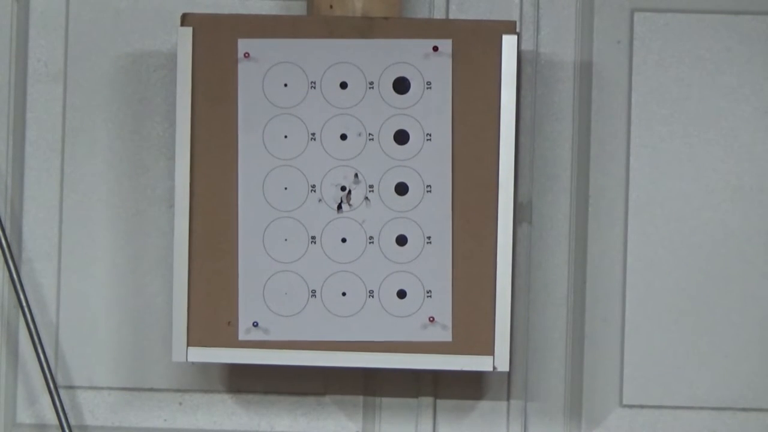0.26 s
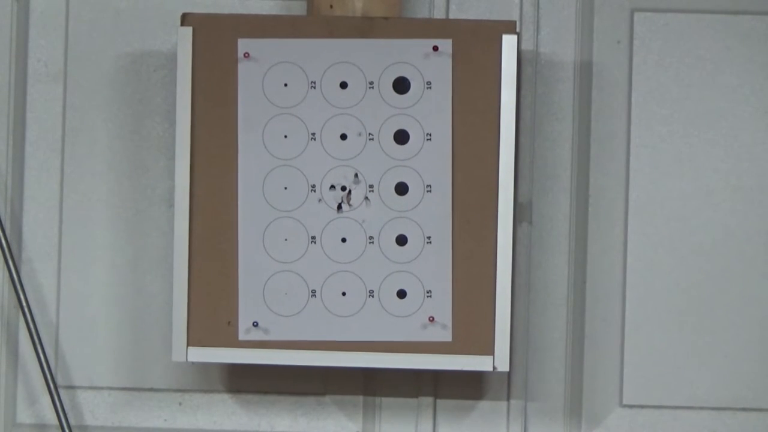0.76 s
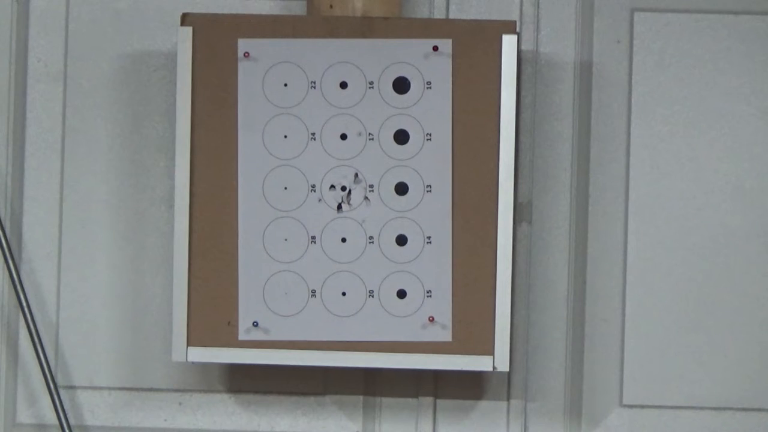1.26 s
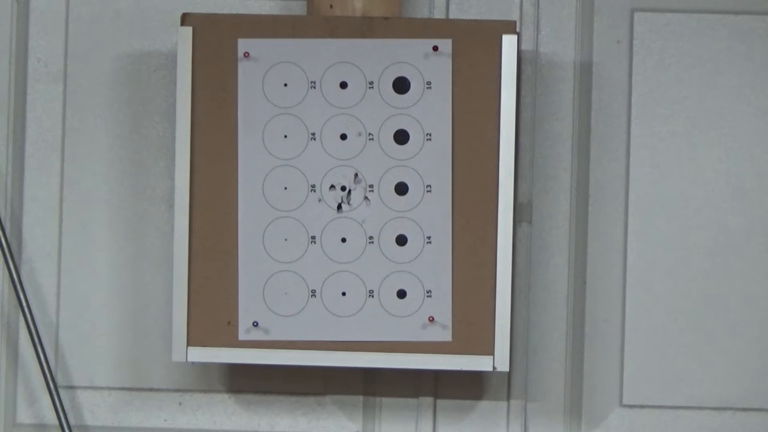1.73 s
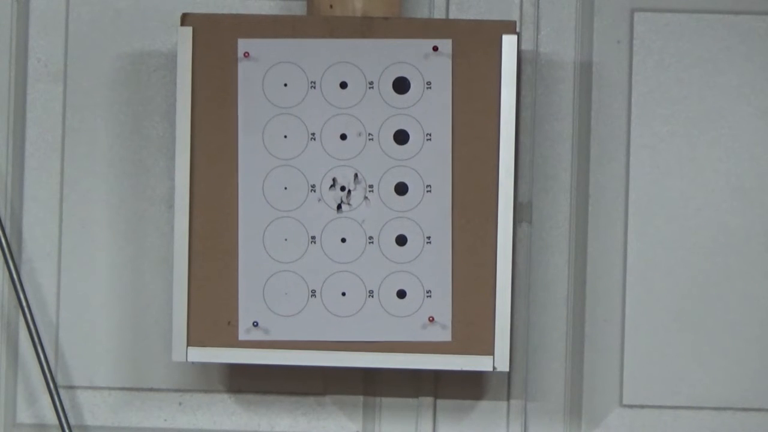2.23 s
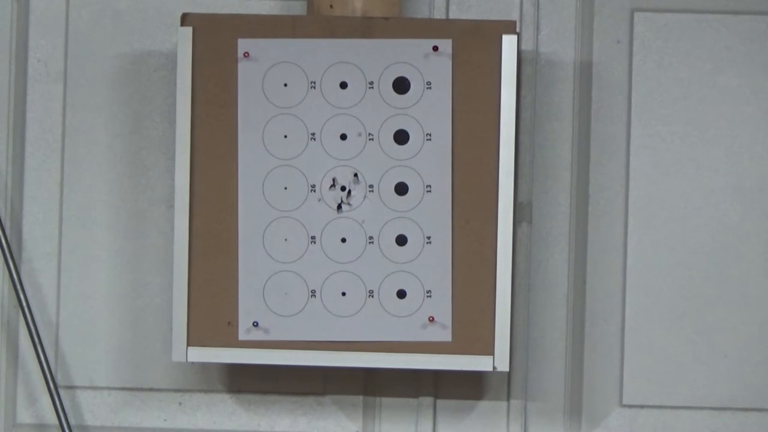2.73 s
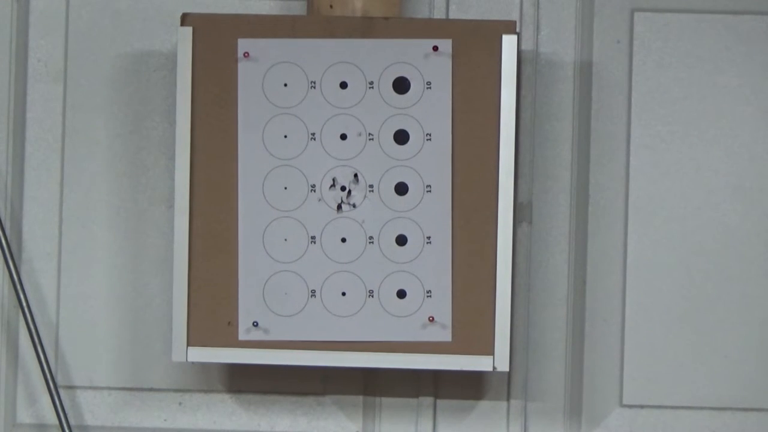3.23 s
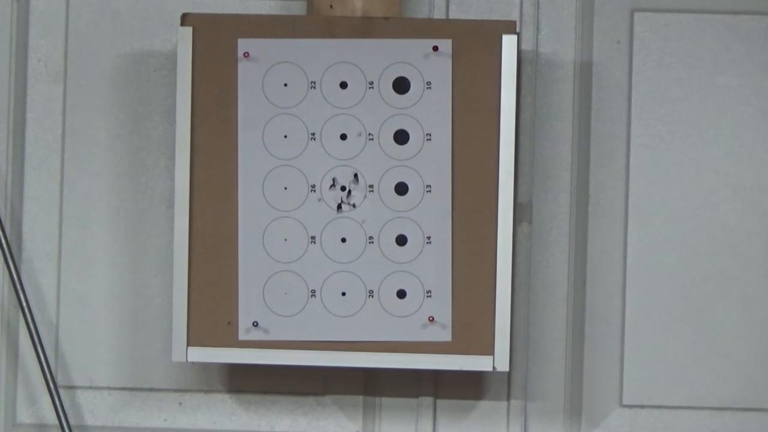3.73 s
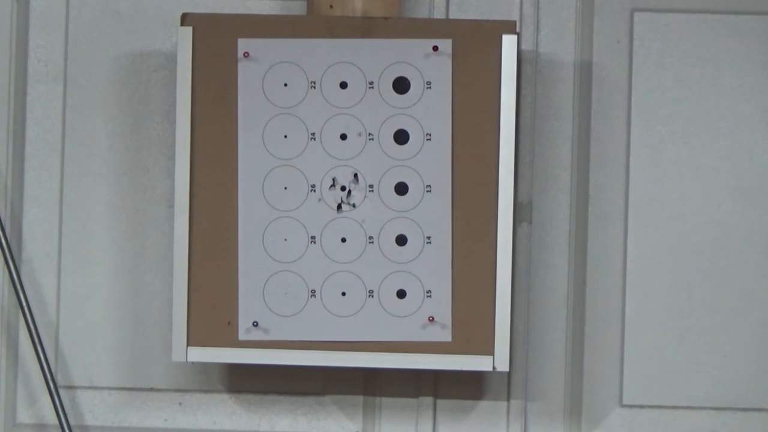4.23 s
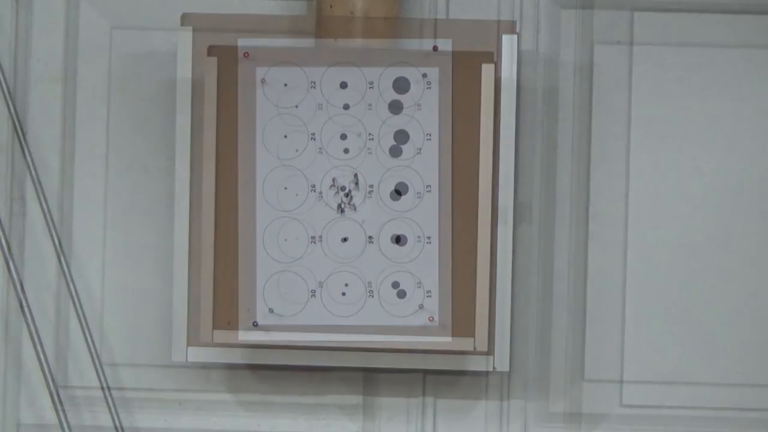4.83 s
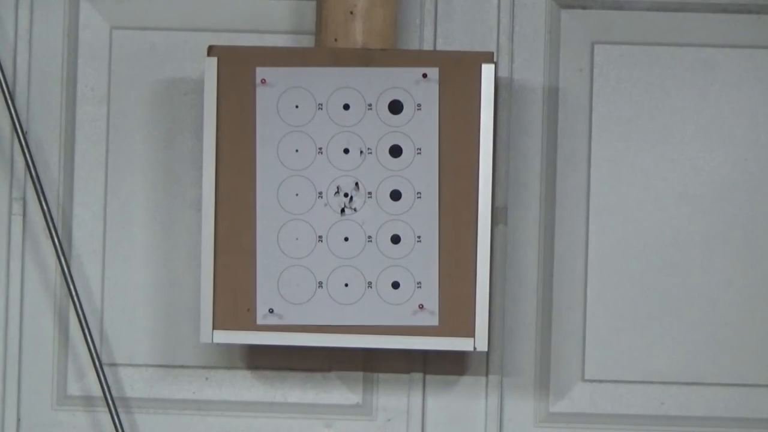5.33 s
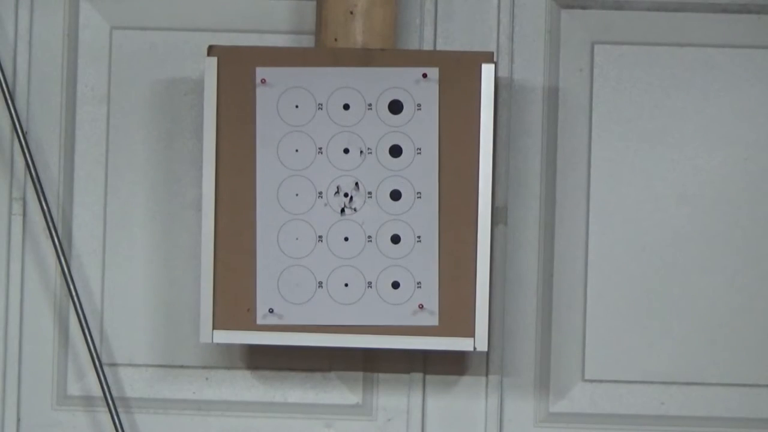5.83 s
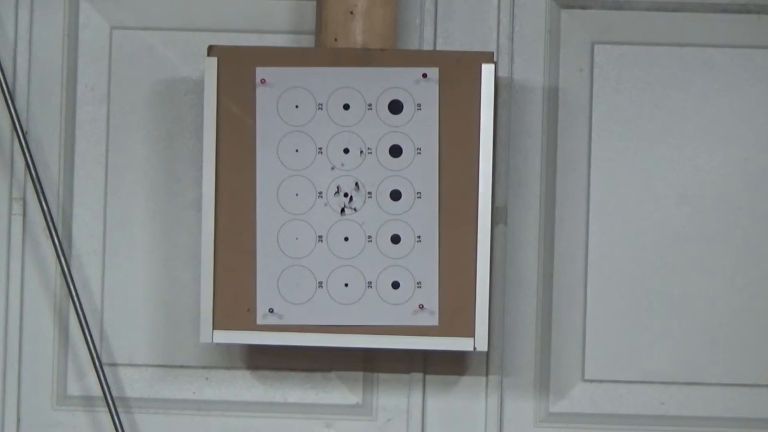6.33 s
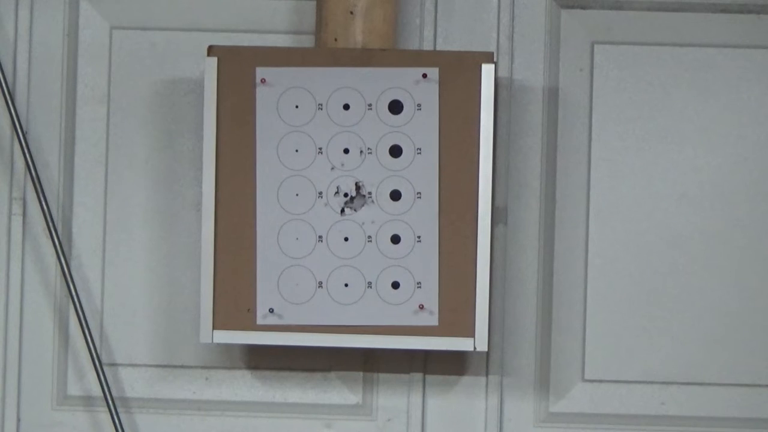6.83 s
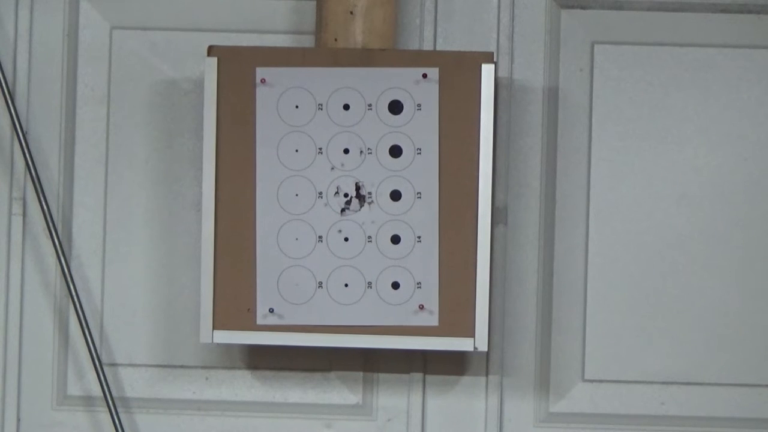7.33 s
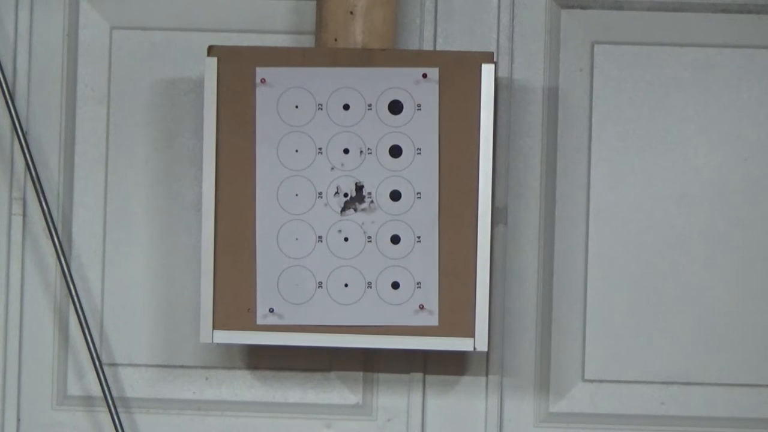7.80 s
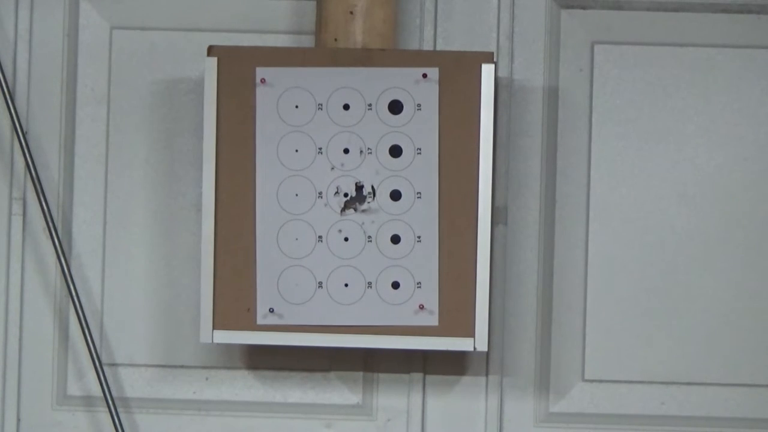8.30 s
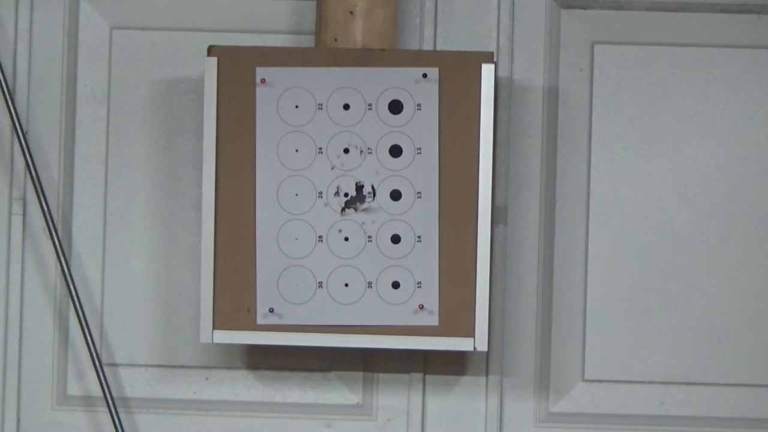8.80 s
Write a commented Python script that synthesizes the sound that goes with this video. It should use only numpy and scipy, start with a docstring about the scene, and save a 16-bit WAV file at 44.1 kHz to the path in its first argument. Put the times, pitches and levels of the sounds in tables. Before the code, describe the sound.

Short gear whines wind up and end in hard, bright piston slams with a tiny muzzle pop; a tenth of a second later each pellet snaps through paper and knocks a ringing box. Seven steady singles leave reverberant gaps with faint air and stray ticks, then a pause, two fast shots, and a sustained burst of about eleven rounds per second, clattering unevenly as impacts vary. Stereo lane echo, recorder limiting the loud bursts.

```python
"""An electric airsoft gun fires at a paper target on a box trap in an echoing lane: seven singles, a double,
full auto. The motor winds up with scraping, whining gears; the piston slams with a short spring ping, and pop
and puff leave the muzzle. A tenth of a second after the slam the pellet snaps, cracks and thuds at the trap,
and modes ring as its panels. Stray pellets and small clicks are struck resonances; shaped noise makes the range
air and the stereo lane. The recorder's limiter ducks around loud bursts."""
import sys
import numpy as np
from scipy import signal
from scipy.fft import rfft, irfft
from scipy.io import wavfile
from scipy.ndimage import uniform_filter1d, minimum_filter1d

SR = 44100
rng = np.random.default_rng(int(sys.argv[2]) if len(sys.argv) > 2 else 0)


def transcribe(u):
    """Save the signal u as a 16-bit wav file named by the first command-line argument.

    u: samples, shape (n,) or (channels, n), limited to [-1, 1]; the rate is SR.
    q: integer samples, one column per channel.
    """
    v = np.clip(np.atleast_2d(u).T, -1, 1)
    q = np.round(v * 32767).astype(np.int16)
    wavfile.write(sys.argv[1], SR, q)


N = 399525
TIME = np.arange(N) / SR
FLIGHT_S = .1  # from piston slam to pellet strike


def from_db(db):
    """Decibels to gain."""
    return 10 ** (np.asarray(db) / 20)


def at_hz(points, hz, axis=1):
    """One column of a table, read on a log-frequency axis."""
    rows = np.array(points, float)
    return np.interp(np.log(np.maximum(hz, 1)), np.log(rows[:, 0]), rows[:, axis])


def unit_energy(x):
    """Scale a sound or response to unit energy; such a response passes white noise at the same level."""
    return x / np.sqrt(np.sum(x ** 2) + 1e-20)


def add(track, s, sound):
    """Mix a sound into a track at a given time."""
    start = int(round(s * SR))
    part = track[..., start:start + sound.shape[-1]]
    part += sound[..., :part.shape[-1]]


def filtered(x, order, edge_hz, kind):
    """Butterworth filter with the given edge or edges."""
    return signal.sosfilt(signal.butter(order, edge_hz, kind, fs=SR, output="sos"), x)


def coloured(x, spectrum, size=4096):
    """Pass a sound through a causal (minimum-phase) body with this spectrum."""
    cepstrum = irfft(np.log(from_db(at_hz(spectrum, np.fft.rfftfreq(size, 1 / SR)))))
    # folding the cepstrum onto positive time makes the phase minimal
    cepstrum[1:size // 2] *= 2
    cepstrum[size // 2 + 1:] = 0
    body = unit_energy(irfft(np.exp(rfft(cepstrum))))
    return signal.oaconvolve(x, body)[:N]


def resonance(x, hz, q):
    """A resonance of gain 1 at its top."""
    return signal.lfilter(*signal.iirpeak(hz, q, fs=SR), x)


def ring(hz, t60, size=20000):
    """One decaying sine mode."""
    return from_db(-60 * TIME[:size] / t60) * np.sin(2 * np.pi * hz * TIME[:size])


def blow(bounce_s, firmness, count=4, size=8192):
    """A chattering contact: lossless loops of chance length spread it without colouring it; unit energy."""
    delays = bounce_s * rng.uniform(.2, 1.8, (count, 1)) * SR
    loop = np.exp(-2j * np.pi * np.fft.rfftfreq(size) * np.ceil(delays))
    return irfft(np.prod((firmness + loop) / (1 + firmness * loop), axis=0))


# Spectrum of the range air: hz, level_db (relative).
AIR_SPECTRUM = [(15, -18), (25, -7.5), (70, -3.5), (114, -11.5), (175, -11), (212, -3.5), (242, -18),
                (301, -7), (384, -9.5), (962, -13.5), (16000, -28.5)]
# Level of the range air over time: time_s, level_db.
AIR_LEVEL = [(0, -52), (.6, -60.5), (4.45, -60), (4.8, -58), (5.6, -60.5)]


def background(side_db=-9):
    """Faint air noise of the range: noise with a slowly changing level and a weaker stereo side."""
    mid, side = (coloured(white, AIR_SPECTRUM) for white in rng.standard_normal((2, N)))
    stereo = mid + from_db(side_db) * side * [[1], [-1]]
    return from_db(np.interp(TIME, *np.transpose(AIR_LEVEL))) * stereo


# Reverberation of the shooting lane: hz, t60_s, lingering_tail_db, side_db (against mid).
LANE = [(149, 0.34, -19, -16), (450, 0.21, -17, -13), (1400, 0.28, -20, -7.5), (4550, 0.27, -38, -8),
        (7050, 0.26, -41, -5.5), (10000, 0.23, -32.5, -19), (14000, 0.2, -63, -48)]


def lane_response(build_s, linger_t60=0.64, hold_s=0.019, size=44100):
    """Diffuse stereo reverberation: it builds up, holds briefly, dies band by band, with a fainter tail."""
    t, hz = TIME[:size], np.fft.rfftfreq(size, 1 / SR)
    noise, out = rfft(rng.standard_normal((2, size))), 0
    edges = np.append(0, np.geomspace(125, SR / 2, 16))
    for low, high in zip(edges, edges[1:]):
        centre = (low + high) / 2
        mid, side = irfft(noise * ((hz >= low) & (hz < high)), size)
        early = from_db(-60 * np.maximum(t - hold_s, 0) / at_hz(LANE, centre))
        late = from_db(at_hz(LANE, centre, axis=2) - 60 * t / linger_t60)
        fade = np.hypot(early, late) * (1 - np.exp(-t / build_s))
        width = from_db(at_hz(LANE, centre, axis=3)) * np.array([[1], [-1]])
        stereo = unit_energy(mid * fade) + width * unit_energy(side * fade)
        out = out + np.sqrt(2 * (high - low) / SR) * stereo
    return out


def in_lane(x, response, direct_db):
    """The direct sound plus its reverberation; their balance sets how distant it seems at the microphone."""
    return from_db(direct_db) * x + signal.oaconvolve(x[None], response, axes=1)[:, :len(x)]


# Held fire: the cycle slows a little as the battery sags;
# the first cycle is longer, the motor not yet at full speed.
CYCLE_S, FRESH_BATTERY_S, SAG_ROUNDS, FIRST_LAG_S = .09363, .00255, 10.4, .0048


def slam_times(first_s, rounds):
    """When the piston slams during one pull of the trigger."""
    k = np.arange(rounds - 1)
    cycles = CYCLE_S - FRESH_BATTERY_S * np.exp(-k / SAG_ROUNDS) + FIRST_LAG_S * (k == 0)
    return first_s + np.append(0, np.cumsum(cycles))


# Crack pitch of a solid hit; less boom makes the crack higher.
SOLID_BOOM_DB, SOLID_CRACK_HZ, CRACK_OCTAVES_PER_DB = 19, 2100, 0.05
# Each dB the aim takes from the boom raises the boom's pitch and the pellet's snap.
BOOM_OCTAVES_PER_DB, SNAP_DB_PER_DB = .02, 0.74
# Chance spread from round to round after the first of a pull (standard deviations).
CRACK_SCATTER_DB, BOOM_SCATTER_DB, SNAP_SCATTER_DB = 4, 0.9, 6
PITCH_SCATTER_OCTAVES = [0.34, 0.12, 0.24]  # crack, boom, piston: standard deviations, in octaves
# In held fire the crack creeps up in pitch as the pellets chew through the same spot.
WEAR_OCTAVES_PER_ROUND = 0.01
# Trigger pulls, levels relative: first_slam_s, rounds, gears_db, crack_db, boom_db, boom_hz,
# pellet_snap_db, piston_snap_hz.
PULLS = [(0.1275, 1, -25, 16.5, 23, 460, 8, 11300), (0.6447, 1, -23.5, 20.5, 14.5, 666, 11, 11100),
         (1.1496, 1, -25, 16.5, 22.5, 540, 16.5, 8900), (1.675, 1, -25.5, 19, 21.5, 450, 11.5, 9200),
         (2.1684, 1, -22.5, 20.5, 19.5, 383, 12, 8700), (2.655, 1, -23.5, 19.5, 16.5, 490, 11, 8750),
         (3.146, 1, -25.5, 17.5, 12, 540, 17, 8600), (5.0932, 2, -22, 25.5, 19, 450, 12, 10600),
         (5.8505, 35, -23.5, 21.5, 23.5, 485, 8, 9700)]
# Wandering aim in full auto, which changes the boom: time_s, boom_change_db.
AIM = [(5.85, -3), (6.2, 0.5), (6.7, -0.5), (6.87, -15), (7.12, -7), (7.25, -0.5), (7.52, -2),
       (7.63, -12.5), (7.89, 1.5), (8.0, -8.5), (8.17, -10.5), (8.27, -1.5), (8.65, 0.5), (8.83, -1),
       (8.92, -11)]


def fire():
    """Every round fired: (slam s, crack dB, boom dB, crack Hz, boom Hz, pellet's snap dB, piston's snap Hz)."""
    shots = []
    for first_s, rounds, _, crack_db, boom_db, boom_hz, snap_db, piston_hz in PULLS:
        for k, s in enumerate(slam_times(first_s, rounds)):
            luck = rng.uniform(-1, 1, 6) * np.sqrt(3) * (k > 0)
            crack_luck, boom_luck, snap_luck = luck[:3]
            crack_shift, boom_shift, piston_shift = 2 ** (luck[3:] * PITCH_SCATTER_OCTAVES)
            aim_db = np.interp(s, *np.transpose(AIM), left=0)
            lighter_db = SOLID_BOOM_DB - boom_db - aim_db
            crack_octaves = CRACK_OCTAVES_PER_DB * lighter_db + WEAR_OCTAVES_PER_ROUND * k
            shots.append((s,
                          crack_db + CRACK_SCATTER_DB * crack_luck,
                          boom_db + aim_db + BOOM_SCATTER_DB * boom_luck,
                          SOLID_CRACK_HZ * 2 ** crack_octaves * crack_shift,
                          boom_hz * 2 ** (-BOOM_OCTAVES_PER_DB * aim_db) * boom_shift,
                          snap_db - SNAP_DB_PER_DB * aim_db + SNAP_SCATTER_DB * snap_luck,
                          piston_hz * piston_shift))
    return shots


# The motor runs this long before a pull's first slam and after its last.
WIND_UP_S, RUN_ON_S = .0888, .008
# Spectrum of the scraping gearbox: hz, level_db (relative).
GEARBOX = [(120, -31.5), (280, -34), (400, -7), (520, -29), (680, 10.5), (850, -4), (1200, 0), (2200, -3.5),
           (3000, 2.5), (4500, -1), (6300, -12), (12000, -9.5), (16000, -20)]


def motor(mesh_hz=2200, spin_up_s=.075, head_start_s=.016, load_sag=.25, wobble=0.07, swell_s=0.019,
          whine_db=-7.5, whine_swell_s=0.022, whine_fade_s=0.082, casing_hz=600):
    """Gear teeth scrape and whine: they mesh faster as the motor spins up and sag near each slam under load."""
    grind, whine = np.zeros(N), np.zeros(N)
    for first_s, rounds, level_db, *_ in PULLS:
        slams = slam_times(first_s, rounds)
        on, off = first_s - WIND_UP_S, slams[-1] + RUN_ON_S
        t = TIME[:int((off - on) * SR)]
        since_slam = (on + t)[:, None] - slams
        load = np.exp(-np.min(np.abs(since_slam), axis=1) / .02)
        shake, bite = uniform_filter1d(rng.standard_normal((2, len(t))), size=100) * 10
        spin_up = 1 - np.exp(-(t + head_start_s) / spin_up_s)
        speed = spin_up * (1 - load_sag * load) * (1 + wobble * shake)
        turn = 2 * np.pi * np.cumsum(mesh_hz * speed) / SR
        scrape = rng.standard_normal(len(t)) * (1 + 0.75 * np.sin(turn))
        scrape = scrape * (1 - np.exp(-(t + 0.00052) / swell_s))
        add(grind, on, from_db(level_db) * scrape)
        # the whine is rough, and strongest while the motor accelerates
        tone = (np.sin(turn) + 0.44 * np.sin(2 * turn)) * (1 + .5 * bite)
        envelope = 2 * (1 - np.exp(-t / whine_swell_s)) * np.exp(-t / whine_fade_s)
        add(whine, on, from_db(level_db + whine_db) * tone * envelope)
    return coloured(grind, GEARBOX), filtered(whine, 2, casing_hz, "high")


# Spectrum of the piston slam: hz, level_db (relative).
SLAM = [(70, -38), (150, -8), (300, -0.5), (800, 3.5), (1300, 6.5), (2200, 1), (2800, 6), (4500, -0.5),
        (6200, 0), (7400, 4), (9200, 2), (10400, -1), (12200, 4), (14000, -5.5), (16000, -7.5)]


def piston(shots, slam_db=23.5, scatter_db=.5, snap_gain=0.78, snap_q=3):
    """The piston slams into the cylinder head: a chattering blow with a bright resonant snap."""
    out = np.zeros(N)
    for s, *_, snap_hz in shots:
        force = blow(bounce_s=.0004, firmness=0.72)
        force = force + snap_gain * resonance(force, snap_hz, snap_q)
        add(out, s, from_db(slam_db + scatter_db * rng.standard_normal()) * unit_energy(force))
    return coloured(out, SLAM)


# Returns of the muzzle's puff from the lane walls: delay_s, level_db.
ECHOES = [(0.044, -48), (0.068, -40)]


def muzzle(shots, pop_db=9, pop_hz=8500, pop_t60=0.00023, ping_db=3, ping_hz=9100, ping_t60=0.0057,
           puff_db=-17, puff_hz=180, puff_t60=0.052, lead_s=0.00507):
    """Decaying modes: a sharp pop, the spring's short ping and, slightly ahead, a low puff that the walls
    return."""
    out = np.zeros(N)
    puff = filtered(from_db(puff_db) * ring(puff_hz, puff_t60), 4, 150, "high")
    pop = from_db(pop_db) * ring(pop_hz, pop_t60, size=1000)
    ping = from_db(ping_db) * ring(ping_hz, ping_t60, size=1000)
    for s, *_ in shots:
        add(out, s, pop + ping)
        # the first arrival is the direct puff
        for delay, echo_db in [(0.00053, 0.024)] + list(ECHOES):
            add(out, s - lead_s + delay, from_db(echo_db) * puff)
    return out


# Spectrum of the crack against the trap: hz, level_db (relative).
HIT = [(80, -57), (220, -19.5), (400, -9), (700, -16.5), (930, 1.5), (1400, 4), (2200, -2.5), (3500, -1.5),
       (5000, -0.5), (6400, -8), (8500, -4.5), (12500, -8), (16000, -18)]


def pellet_hits(shots, crack_gain=2.53, crack_q=1.25, thud_db=-8, thud_q=1.84, snap_hz=11500, snap_q=3.0):
    """Each pellet snaps through the paper, cracks on the trap and thuds into the box: resonant short blows."""
    cracks, others = np.zeros(N), np.zeros(N)
    for s, crack_db, boom_db, crack_hz, boom_hz, snap_db, _ in shots:
        force = blow(bounce_s=.0008, firmness=0.76)
        crack = force + crack_gain * resonance(force, crack_hz, crack_q)
        add(cracks, s + FLIGHT_S, from_db(crack_db) * unit_energy(crack))
        thud = resonance(resonance(force, boom_hz, thud_q), boom_hz, 0.7)
        snap = blow(bounce_s=0.00027, firmness=0.86)
        snap = resonance(resonance(snap, snap_hz, snap_q), snap_hz, 0.71)
        add(others, s + FLIGHT_S, from_db(boom_db + thud_db) * unit_energy(thud))
        add(others, s + FLIGHT_S, from_db(snap_db) * unit_energy(snap))
    return coloured(cracks, HIT) + others


# Ringing panels of the box trap: pitch_hz, level_db (relative), t60_s.
BOX = [(301.4, -9.5, 0.15), (344.6, -2.5, 0.2), (396.5, 1, 0.2), (453, 1, 0.19), (478, 5.5, 0.22),
       (607, -2, 0.21), (655.4, 4.5, 0.13), (723, -1.5, 0.19), (834, 1, .18), (1068, -4, .18),
       (1208, -2.5, 0.21), (1285, -0.5, 0.26), (1366, -5, 0.2), (1380, -9, 0.15), (1642, 2, 0.19)]


def box_boom(shots, boom_db=-2.5, scatter_db=3.0, octave_db=-3, swell_s=0.008, size=18000):
    """The panels take up the blow and ring, favouring modes near the hit's pitch, differently each time."""
    out, t = np.zeros(N), TIME[:size]
    hz, mode_db, t60 = np.transpose(BOX)
    decay = from_db(-60 * t / t60[:, None])
    modes = decay * np.exp(2j * np.pi * hz[:, None] * t) * (1 - np.exp(-t / swell_s))
    for s, _, level_db, _, boom_hz, *_ in shots:
        luck, phase = rng.standard_normal((2, len(BOX)))
        octaves_away = np.abs(np.log2(hz / boom_hz))
        strength = from_db(mode_db + scatter_db * luck + octave_db * octaves_away)
        panels = np.real((strength * np.exp(2j * np.pi * phase)) @ modes)
        add(out, s + FLIGHT_S, from_db(level_db + boom_db) * unit_energy(panels))
    return out


# Low hum of the box after the first hit: start_s, pitch_hz, level_db, t60_s.
RUMBLE = [(.228, 68.5, -44.5, 1), (.228, 85, -49.5, 0.98)]


def rumble():
    """The deepest modes of the mounted box, as decaying sines."""
    out = np.zeros(N)
    for s, hz, level_db, t60 in RUMBLE:
        add(out, s, from_db(level_db) * ring(hz, t60, size=50000))
    return out


# Stray pellets and small clicks, levels relative: start_s, level_db, resonance_hz, lower_edge_hz,
# direct_db, ringing_db.
CLICKS = [(.341, -8.5, 4000, 2500, -6, -30), (2.4715, -10, 3480, 1500, -9, 1),
          (3.052, -22, 11000, 6000, -11, -30), (3.443, 5.5, 12500, 1800, -14, -4),
          (3.7, -5.5, 3870, 2220, -12, -5.5), (3.835, -28, 9000, 3000, -9, -20),
          (3.941, -35, 9000, 3000, -5, -17), (4.0538, -10, 3440, 2500, -1, -9.5),
          (5.666, -4, 1060, 815, -10, -34)]


def small_clicks(response, body_gain=1.25, top_hz=13000, sheet_t60=0.62, sheet_band_hz=(1200, 4600), size=30000):
    """Hard little contacts, each with its own resonance and distance, plus the shiver of a metal sheet."""
    out = np.zeros((2, N))
    for s, level_db, body_hz, low_hz, direct_db, ringing_db in CLICKS:
        force = np.zeros(size)
        add(force, 0, blow(bounce_s=0.00018, firmness=0.73))
        force = force + body_gain * resonance(force, body_hz, 3)
        force = filtered(force, 2, low_hz, "high")
        force = filtered(force, 1, top_hz, "low")
        # the sheet's modes lie too close to be heard apart, so decaying noise stands for them
        sheet = rng.standard_normal(size) * from_db(-60 * TIME[:size] / sheet_t60)
        sheet = filtered(sheet, 3, sheet_band_hz, "band")
        click = in_lane(unit_energy(force), response, direct_db)
        add(out, s, from_db(level_db) * (click + from_db(ringing_db) * unit_energy(sheet)))
    return out


def scene():
    """Gun and target stand at different places in the lane, so each has its own reverberation."""
    from_gun, from_target = lane_response(build_s=0.0045), lane_response(build_s=0.00088)
    shots = fire()
    grind, whine = motor()
    gears = in_lane(grind, from_gun, direct_db=-11)
    gears = gears + in_lane(whine, from_db(-7.5) * from_gun, direct_db=1.0)
    gun = gears + in_lane(piston(shots), from_gun, direct_db=-13.5) + muzzle(shots)
    boom = in_lane(box_boom(shots), from_db(-7.0) * from_target, direct_db=-1.5)
    boom = boom * from_db([[.6], [-.6]])  # leans slightly left
    target = in_lane(pellet_hits(shots), from_target, direct_db=-10.5) + boom + rumble()
    return (gun + target) * from_db([[.15], [-.15]]) + small_clicks(from_target) + background()


def released(over_db, db_per_s):
    """Hold each excess and let it fall at a steady rate."""
    return np.maximum.accumulate(np.maximum(over_db, 0) + db_per_s * TIME) - db_per_s * TIME


def smoothed_db(power, size):
    """Running mean power in decibels."""
    return 10 * np.log10(np.abs(uniform_filter1d(power, size=size)) + 1e-12)


def record(dry, burst_db=-13.5, fast_db_per_s=1500, loud_db=-13.5, slow_db_per_s=150, cutoff_hz=15900):
    """A look-ahead limiter and a slower compressor, both treble-weighted; peaks are rounded, the top is cut."""
    power = np.mean(dry ** 2 + np.diff(dry, prepend=0) ** 2, axis=0)
    # the running maximum sees about 2 ms ahead
    ahead = -minimum_filter1d(-smoothed_db(power, 60), size=90, origin=-44)
    fast = released(ahead - burst_db, fast_db_per_s)
    slow = released(smoothed_db(power, 300) - loud_db, slow_db_per_s)
    limited = dry * from_db(-uniform_filter1d(np.maximum(fast, slow), size=30))
    top_cut = signal.ellip(12, .1, 80, cutoff_hz, fs=SR, output="sos")
    return signal.sosfilt(top_cut, np.tanh(limited))


dry = scene()
out = record(dry)
transcribe(out)
```